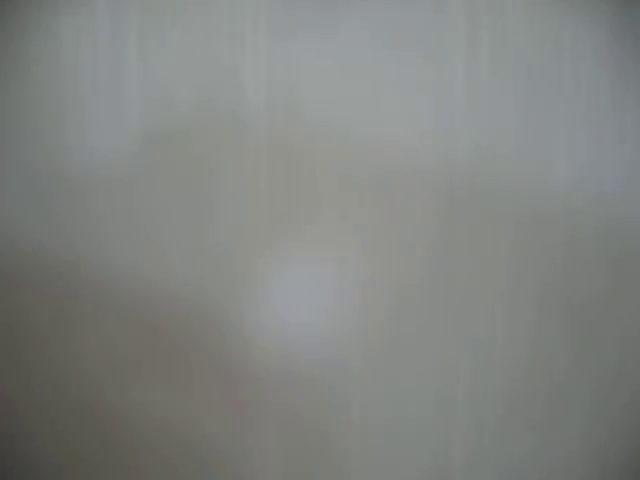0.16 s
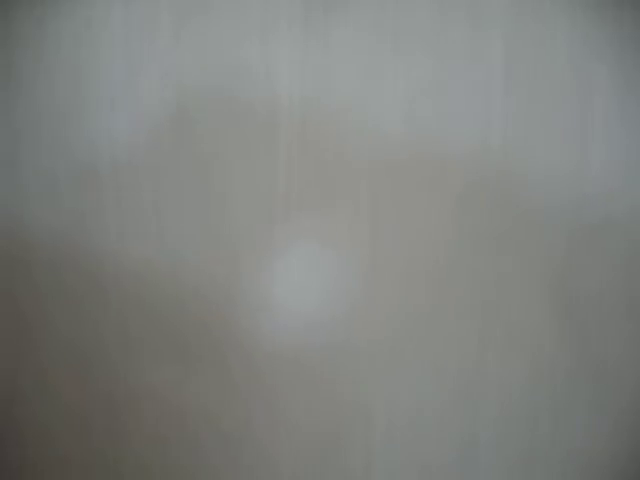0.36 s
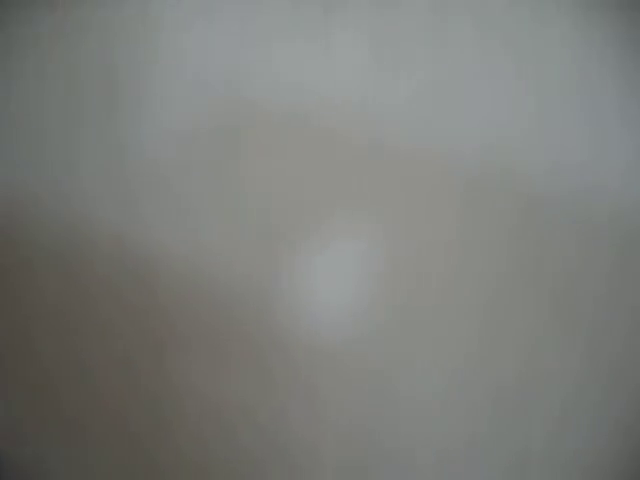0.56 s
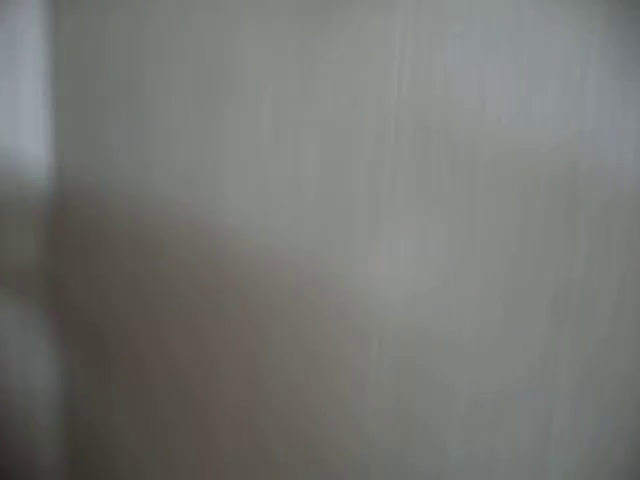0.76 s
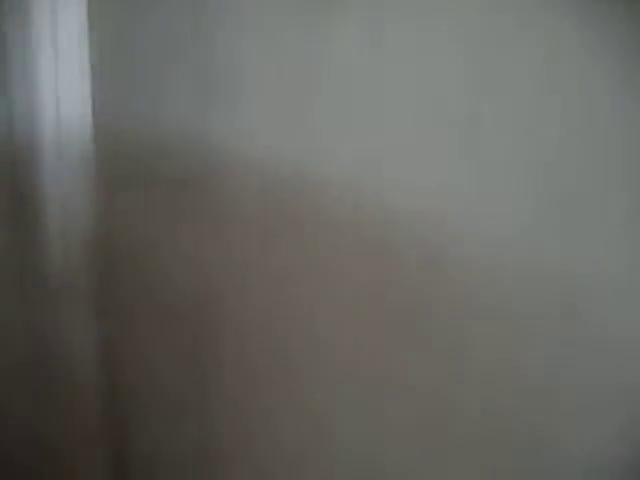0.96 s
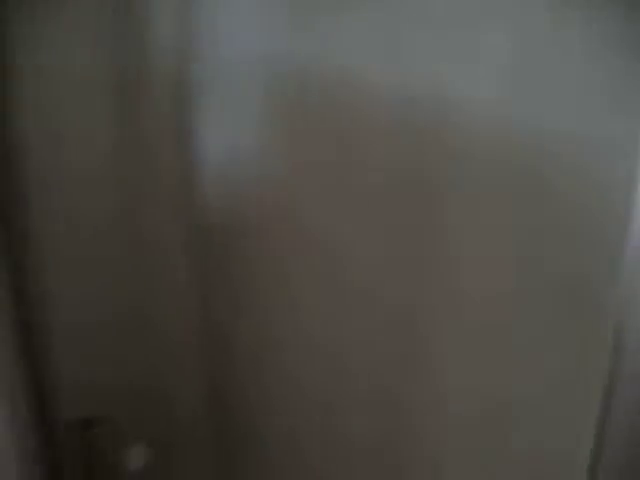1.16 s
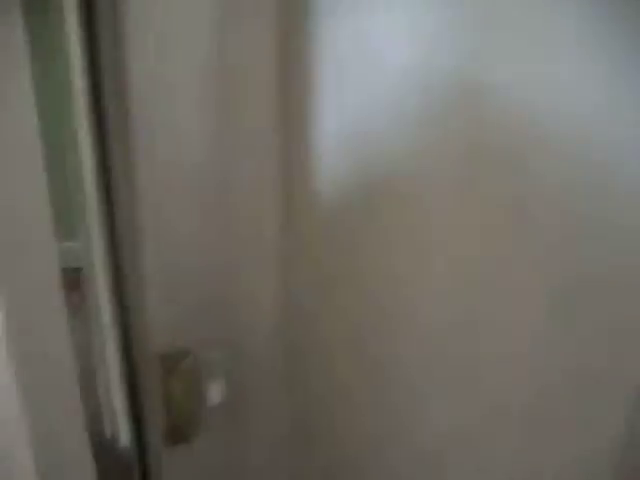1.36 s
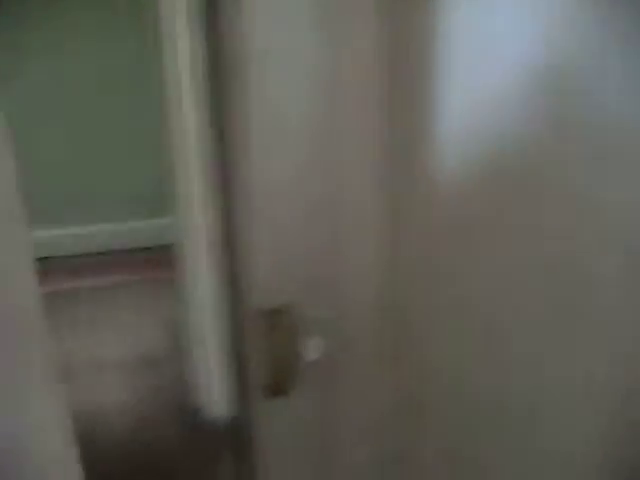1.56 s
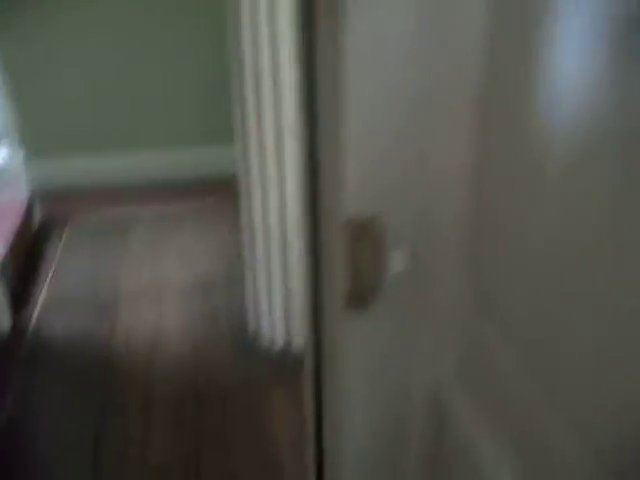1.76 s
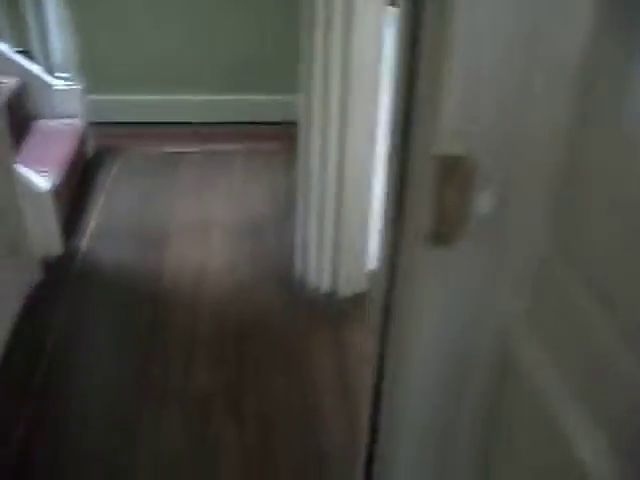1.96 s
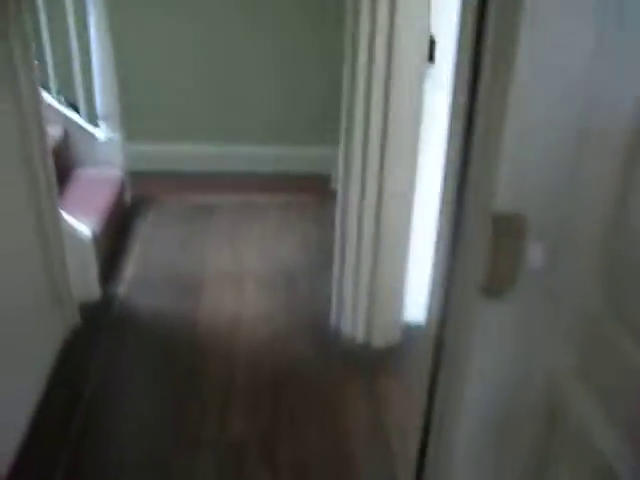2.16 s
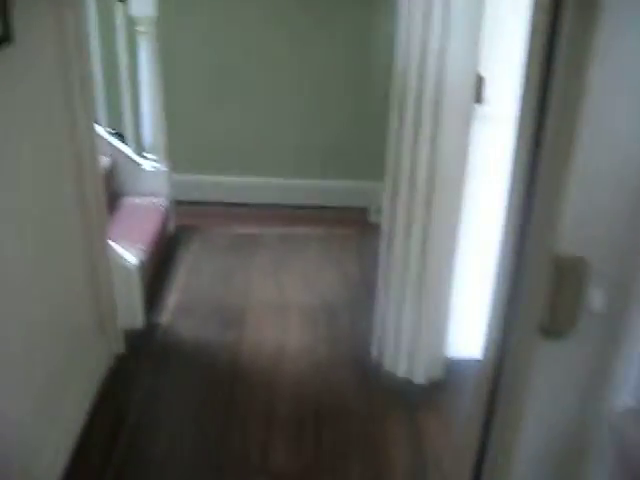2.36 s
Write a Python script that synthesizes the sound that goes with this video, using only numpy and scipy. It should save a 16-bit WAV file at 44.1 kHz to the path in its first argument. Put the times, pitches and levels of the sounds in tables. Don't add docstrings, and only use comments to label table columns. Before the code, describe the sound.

A wooden door is unlatched close to a handheld microphone: a sharp double clack and short rattle, small ticks, a quiet gap, then soft scuffs and a faint knock, over low rumble and hiss.

```python
import sys
import numpy as np
from scipy import signal
from scipy.fft import rfft, irfft
from scipy.io import wavfile
from scipy.ndimage import uniform_filter1d

SR = 44100
rng = np.random.default_rng(int(sys.argv[2]) if len(sys.argv) > 2 else 0)


def wav_out(sig):
    wavfile.write(sys.argv[1], SR, np.round(np.clip(np.atleast_2d(sig).T, -1, 1) * 32767).astype(np.int16))


def undo_db(level):
    steps = np.asarray(level, float) / 20
    return 10 ** steps


N = 105840

# start in seconds, level in dB,
# rattle decay in seconds, centre in Hz, width in octaves.
DOOR_CONTACTS = [(.001, -41.5, 0.039, 820, 1.9), (.14, -52.5, 0.0176, 694, .8),
                 (.2075, -38.5, 0.03, 1520, 1.4), (.2125, -22.5, 0.014, 7000, 3.8),
                 (0.2137, -30, 0.038, 2000, 2), (.22, -26.5, 0.02, 1480, 1.04),
                 (.25, -18.5, 0.011, 3990, 1.63), (.2515, -14.5, 0.019, 1601, 1.85),
                 (.264, -31.5, 0.08, 2140, 1.5), (.292, -32.5, 0.054, 1190, 1.06),
                 (.42, -42, 0.01, 5500, 0.47), (.421, -40.5, 0.031, 1500, 1.4), (.43, -41, 0.0094, 3280, 0.48),
                 (.5515, -36, 0.0064, 9700, 1.5), (.553, -40.5, 0.0093, 1960, 0.9),
                 (.67, -47.5, .008, 5240, 0.63),
                 (1.37, -46, 0.047, 1320, 2.3), (1.394, -36, 0.09, 2160, 1.2),
                (1.4065, -39, 0.017, 3339, 2.3), (1.4225, -30.5, 0.0092, 4950, 1.01),
                (1.426, -33.5, 0.0208, 1820, 2.13), (1.442, -39, .03, 2860, 0.89),
                (1.459, -44, 0.052, 1600, 2.4), (1.7455, -42.5, .014, 1300, 2.4),
                (1.752, -48, 0.031, 706, 1.2), (1.762, -43.5, .012, 4000, 1.1),
                (1.767, -42.5, 0.063, 1704, 1.26), (1.413, -41, .012, 2000, .9),
                (1.435, -44.5, .03, 7000, 1), (1.955, -48.5, 0.055, 278.5, 0.82)]
# frequency in Hz, level in dB, T60 in seconds.
PANEL_MODES = [(413, -4.5, 0.27), (608, -1.5, 0.12), (818, 7.5, 0.03), (959, 8.5, 0.048), (1070, -7, 0.024),
               (1286, -1, 0.027), (1405, 0.5, 0.032), (1676, 0.5, 0.0676), (1987, -10.5, 0.069),
               (2201, 2, 0.036), (2532, -7, 0.03), (3505, -15.5, 0.106), (3872, 3, 0.048), (5260, 6, 0.028)]
# frequency in Hz, gain in dB.
LEAF_COLOUR = [(300, 15), (700, 4.5), (1300, 5.5), (2200, 4), (2900, 1.5), (3600, 5), (4300, -1.5),
               (9500, 3)]
# start in seconds, level in dB, pitch in Hz, T60 in seconds.
KNOCK_TONES = [(.2, -27, 43.6, 0.466), (.255, -30.5, 96, 0.106), (.39, -28, 74, .15),
               (0.393, -40, 150, 0.16), (1.953, -35.5, 271, 0.12), (1.953, -34.5, 342.7, 0.094),
               (1.952, -45, 199, 0.042), (1.752, -38, 287, 0.0719), (.21, -39.5, 217.1, 0.25),
               (0.25, -35.5, 330, 0.153), (0.26, -26.5, 412, 0.11), (.296, -35, 958, 0.079),
               (.213, -26.5, 4750, 0.034), (0.22, -17.5, 1656, 0.019), (.272, -46, 3505, 0.217),
               (1.43, -42, 1800, 0.055), (1.42, -34.5, 1080, 0.095), (1.49, -39, 1000, 0.052),
               (1.771, -41, 1550, .03), (1.774, -46, 1999, .05), (.213, -30.5, 3780, 0.048),
               (.21, -38, 148, .35), (0.32, -37, 2130, 0.072), (.3, -42, 300, .2)]
# time in seconds, pitch in Hz, level in dB.
SQUEAK_TRACK = [
    (1.693, 7150, -58),
    (1.699, 7035, -49),
    (1.704, 6980, -50),
    (1.707, 6966, -43),
    (1.711, 6910, -41.5),
    (1.714, 6950, -54.5),
    (1.73, 6880, -64),
    (1.745, 6850, -57),
    (1.752, 6940, -66),
]
# time in seconds, pitch in Hz, level in dB.
SHAFT_TRACK = [(0, 28.6, -39), (.2, 30.2, -51.5), (.35, 29.96, -42), (.5, 30.47, -45), (1.35, 30.33, -45.5),
               (1.5, 31.28, -49.5), (1.62, 31.13, -45), (1.88, 30.05, -42.5), (1.97, 29.8, -51),
               (2.12, 31.4, -49.5), (2.2, 32.1, -45), (2.4, 30.56, -48)]
# time in seconds, pitch in Hz, level in dB.
THIRD_TRACK = [(0, 90.2, -51), (.5, 88.9, -54.5), (.65, 89, -46.5), (.85, 88.8, -56.5), (1, 89.2, -58),
               (1.15, 88.1, -50), (1.4, 89.82, -57.5), (2.4, 89, -54)]
# pitch in Hz, level in dB, flutter in dB.
MOTOR_OVERTONES = [(60, -62, 2.5), (177.6, -66, 2.5), (7170, -77, 3)]
# frequency in Hz, density in dB per Hz.
NOISE_SPECTRUM = [(12, -10), (40, -5.5), (100, -9.5), (150, -13.5), (300, -18), (1000, -25.5),
                  (3000, -31.5), (10000, -36.5)]
# time in seconds, gain in dB.
RUMBLE_SWELL = [(0, 8), (.15, 1.5), (.5, 0.5), (.7, -1.55), (1.3, -1.3), (1.6, 0), (1.9, -0.53), (2.08, -4),
                (2.25, 1.5), (2.4, -0.5)]
# frequency in Hz, gain in dB.
MIC_RESPONSE = [(9800, 1.52), (10500, -1.5), (10900, -16), (11600, -13.5), (12200, -26), (12600, -55)]

ATTACK_S, RISE_PER_DECAY_SQUARED, GRIT_DB = 0.00012, 2.84, 2.2
PANEL_DB, MODE_SPREAD_DB = -48, 2
KNOCK_PUSH_CYCLES, SQUEAK_GRAIN_DB = 0.9, 2
DOOR_ROOM_DB, SQUEAK_ROOM_DB = -8.5, -10
ROOM_T60_LOW_S, ROOM_T60_HIGH_S, ROOM_SPLIT_HZ, ROOM_GAP_S = 0.44, 0.36, 3200, 0.0065
NOISE_DB, RUMBLE_HZ, RUMBLE_FLICKER_DB = -51.5, 900, 1
MIC_LIMIT = 0.55


def shape(x, gain):
    hz = np.maximum(np.fft.rfftfreq(len(x), 1 / SR), 1)
    return irfft(rfft(x) * gain(hz), len(x))


def log_curve(table):
    hz, db = np.array(table).T
    return lambda f: undo_db(np.interp(np.log(f), np.log(hz), db))


def unit(x):
    return x / np.sqrt(np.mean(x ** 2))


def walk(rate_hz):
    hold = int(SR / rate_hz)
    steps = np.repeat(rng.standard_normal(N // hold + 1), hold)
    smooth = uniform_filter1d(uniform_filter1d(steps, hold), hold)
    return unit(smooth[:N])


def tone(table):
    s, hz, db = np.array(table).T
    t = np.arange(N) / SR
    gate = np.clip(np.minimum(t - s[0], s[-1] - t) / 0.003 + 1, 0, 1)
    phase = 2 * np.pi * np.cumsum(np.interp(t, s, hz)) / SR
    return 2 ** 0.5 * gate * undo_db(np.interp(t, s, db)) * np.sin(phase)


def ring(x, hz, t60_s):
    pole = np.exp(2j * np.pi * hz / SR - np.log(1000) / (t60_s * SR))
    return signal.lfilter([1], [1, -pole], x).imag


def panel_ring(crack):
    out = np.zeros(len(crack))
    for hz, db, t60_s in PANEL_MODES:
        out += undo_db(db + MODE_SPREAD_DB * rng.standard_normal()) * ring(crack, hz, t60_s)
    return out


def contacts():
    size = 16384
    out = np.zeros(N + size)
    t = np.arange(size) / SR
    for start_s, db, decay_s, hz, octaves in DOOR_CONTACTS:
        grit = rng.standard_normal(size) * undo_db(GRIT_DB * rng.exponential(size=size))
        coloured = unit(shape(grit, lambda f: 1 / (1 + (np.log2(f / hz) / octaves) ** 2) ** 2))
        rise_s = ATTACK_S + RISE_PER_DECAY_SQUARED * decay_s ** 2
        crack = coloured * (1 - np.exp(-t / rise_s)) * np.exp(-3 * t / decay_s)
        i = int(start_s * SR)
        out[i:i + size] += undo_db(db) * (crack + undo_db(PANEL_DB) * panel_ring(crack))
    return shape(out, log_curve(LEAF_COLOUR))[:N]


def knocks():
    t = np.arange(N) / SR
    out = np.zeros(N)
    for start_s, db, hz, t60_s in KNOCK_TONES:
        age = np.maximum(t - start_s, 0)
        push = 1 - np.exp(-age * hz / KNOCK_PUSH_CYCLES)
        out += undo_db(db) * push * undo_db(-60 * age / t60_s) * np.sin(2 * np.pi * hz * age)
    return out


def hinge_squeak():
    return tone(SQUEAK_TRACK) * undo_db(SQUEAK_GRAIN_DB * walk(350))


def room(x):
    t = np.arange(SR // 2) / SR
    noise = rng.standard_normal(len(t))
    low = shape(noise, lambda f: 1 / (1 + (f / ROOM_SPLIT_HZ) ** 2))
    tail = low * undo_db(-60 * t / ROOM_T60_LOW_S) + (noise - low) * undo_db(-60 * t / ROOM_T60_HIGH_S)
    tail = tail * (1 - np.exp(-t / ROOM_GAP_S))
    return signal.fftconvolve(x, tail / np.sqrt(np.sum(tail ** 2)))[:N]


def motor():
    t = np.arange(N) / SR
    out = tone(SHAFT_TRACK) + tone(THIRD_TRACK)
    for hz, db, flutter_db in MOTOR_OVERTONES:
        level = 2 ** 0.5 * undo_db(db + flutter_db * walk(4.6))
        out += level * np.sin(2 * np.pi * hz * t + 1.556 * walk(40))
    return out


def background():
    noise = shape(rng.standard_normal(N), log_curve(NOISE_SPECTRUM))
    noise = noise * undo_db(NOISE_DB) / shape(noise, lambda f: f > 200).std()
    rumble = shape(noise, lambda f: 1 / (1 + (f / RUMBLE_HZ) ** 2))
    s, db = np.array(RUMBLE_SWELL).T
    swell_db = np.interp(np.arange(N) / SR, s, db)
    return noise - rumble + rumble * undo_db(swell_db + RUMBLE_FLICKER_DB * walk(7.5))


def scene():
    door = contacts() + knocks()
    squeak = hinge_squeak()
    hall = room(undo_db(DOOR_ROOM_DB) * door + undo_db(SQUEAK_ROOM_DB) * squeak)
    return (door + squeak + hall + motor() + background())[None]


def top_cut(x):
    return signal.sosfilt(signal.butter(12, 12330, fs=SR, output="sos"), x)


def record(dry):
    hz, db = np.array(MIC_RESPONSE).T
    rounded = MIC_LIMIT * np.tanh(dry[0] / MIC_LIMIT)
    padded = np.pad(rounded, 999, mode="reflect")
    mix = shape(padded, lambda f: undo_db(np.interp(f, hz, db)))[None, 999:-999]
    return top_cut(mix)


dry = scene()
out = record(dry)
wav_out(out)
```